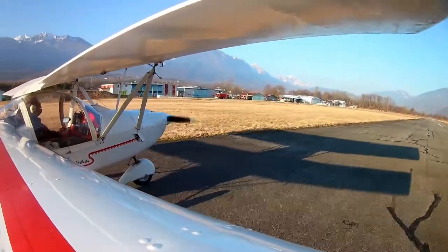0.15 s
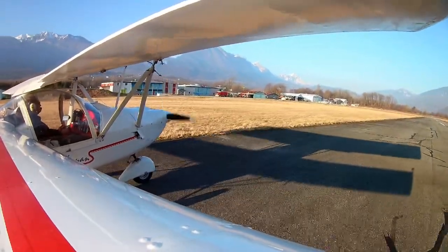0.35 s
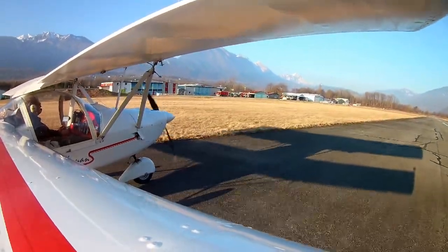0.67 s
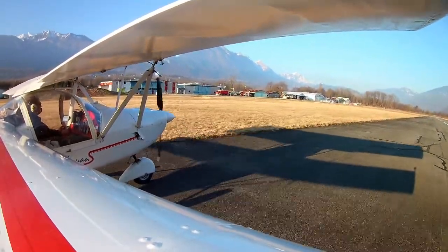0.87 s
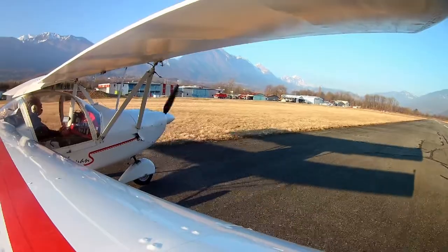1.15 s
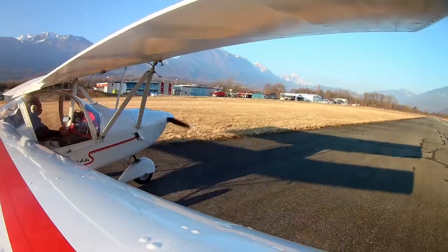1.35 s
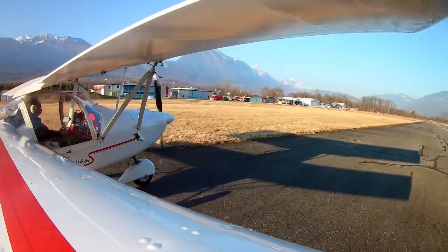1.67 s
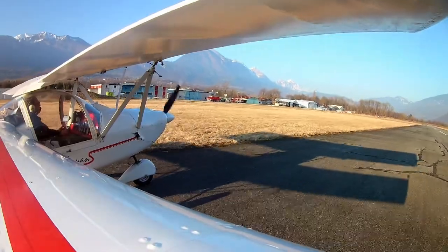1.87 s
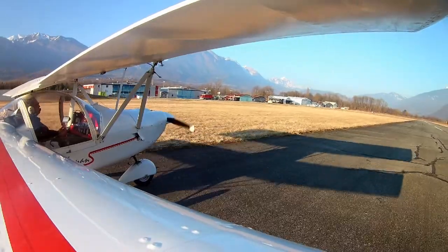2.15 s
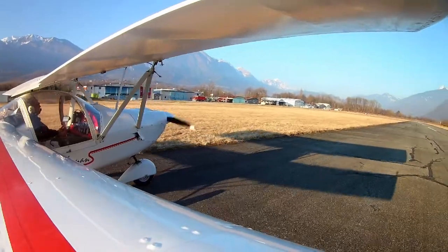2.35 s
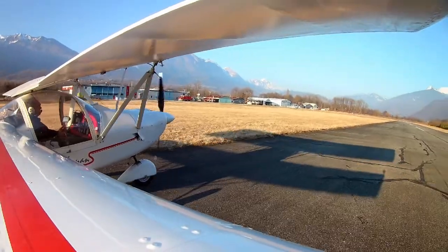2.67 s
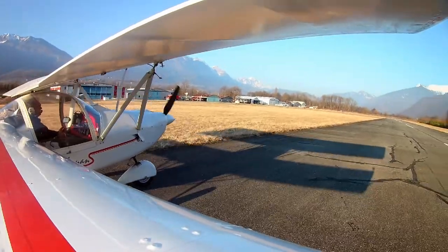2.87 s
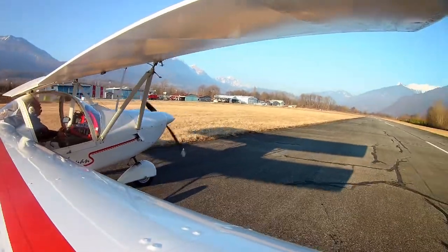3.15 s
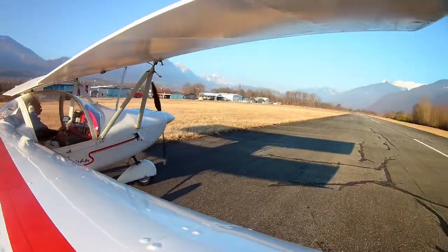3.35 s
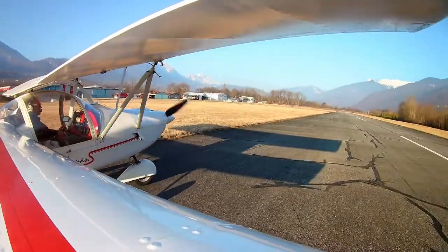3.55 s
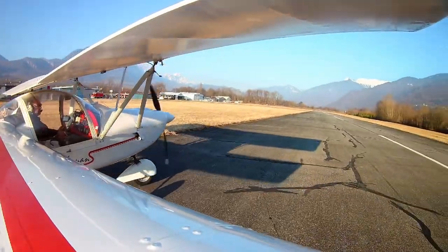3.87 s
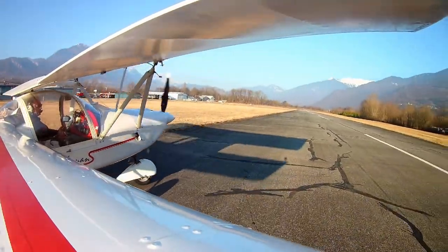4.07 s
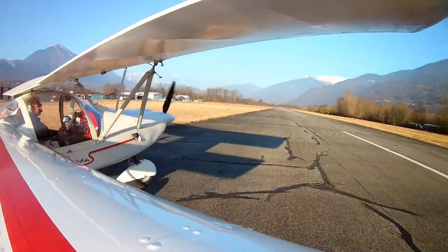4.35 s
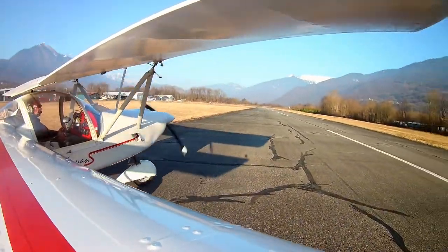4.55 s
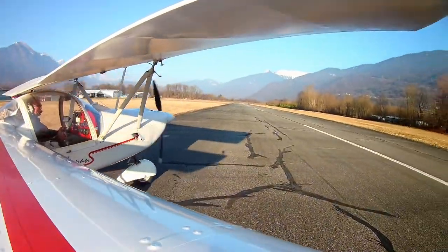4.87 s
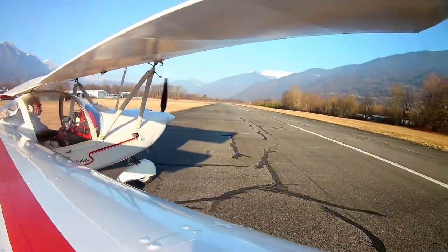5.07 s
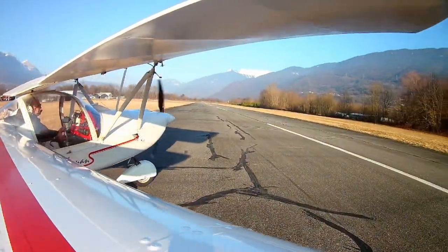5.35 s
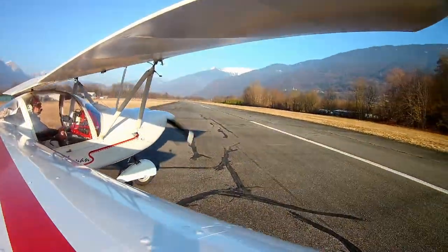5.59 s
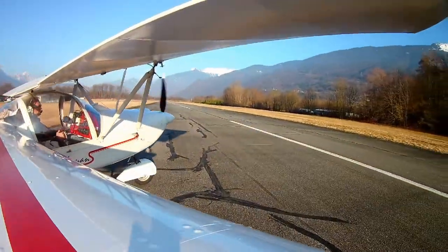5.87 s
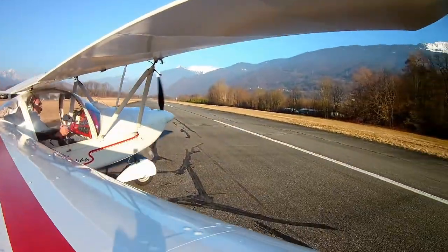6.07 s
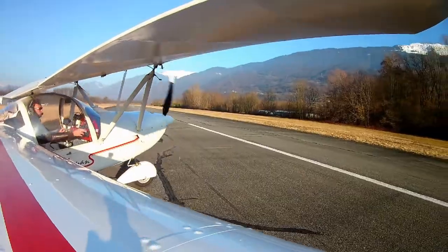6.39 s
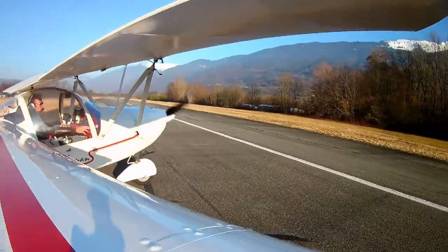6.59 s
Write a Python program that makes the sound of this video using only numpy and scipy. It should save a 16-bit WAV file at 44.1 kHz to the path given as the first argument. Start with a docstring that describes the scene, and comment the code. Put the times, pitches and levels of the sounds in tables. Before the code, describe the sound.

Low light-aircraft engine drone with rattling metal gears and tyre rumble; scattered air thumps hit the microphone, then rapid distorted propeller blasts take over.

```python
"""Light aircraft taxiing, heard at the wing

The engine drones (sine waves), puffs and ticks (pulsing noise), while its propeller gearbox clatters
(clicks and short bursts of noise, coloured like metal). Tyres rumble on asphalt (wavering noise).
Swirls of air shed by the blades thump the camera's microphone now and then (sudden swings of pressure).
Near the end, as the aircraft turns, every blade hits and overloads it. Gusts, swishes and whistles
are noise or tones that swell and fade."""
import sys
import numpy as np
from scipy import signal
from scipy.fft import rfft, irfft
from scipy.io import wavfile
from scipy.ndimage import uniform_filter1d

SR = 44100
rng = np.random.default_rng(int(sys.argv[2]) if len(sys.argv) > 2 else 0)


def put_to_file(sound):
    """Save the sound as 16-bit audio at rate SR, in the file named by the first command-line argument."""
    columns = np.atleast_2d(sound).T  # one column per channel
    safe = np.clip(columns, -1, 1)
    whole_steps = np.round(safe * 32767)
    wavfile.write(sys.argv[1], SR, whole_steps.astype(np.int16))


N = 296352
TIME = np.arange(N) / SR  # seconds

# Engine speed. Each row: time in seconds, shaft turns per second before a small wobble.
SHAFT_SPEED = [(0, 25.37), (1.2, 25.2), (1.7, 27.96), (2.4, 26.82), (3.45, 28.85), (3.8, 26.45),
               (4.7, 27.16), (5.1, 29.18), (5.55, 30.2), (5.8, 27.47), (6.72, 28.26)]
# Tones of the engine drone. Each row: multiple of the shaft speed, level in dB relative to each other.
DRONE_TONES = [(1, 5), (2, -10), (3, -3), (4, -4), (5, -0.5), (6, -5), (7, -3.5), (8, -14), (9, -18)]
# Exhaust loudness. Each row: time in seconds, relative level in dB.
EXHAUST_LEVEL = [(0.0, -47), (0.66, -43.5), (0.86, -44.5), (1.78, -48.5), (2.26, -42.5), (3.8, -44),
                 (4.15, -40.5), (5.24, -40.5), (5.55, -38.5), (6.01, -34.5), (6.4, -29), (6.6, -31.5)]
# Colour of the exhaust noise. Each row of this and every other colour: frequency in Hz, relative level in dB.
EXHAUST_COLOUR = [(150, -12), (400, -9), (620, -2), (800, 1), (950, 2), (1150, -5.5), (1450, 0),
                  (1900, -13), (2400, -16.5), (3200, -27), (7000, -67)]
# Loudness of the machinery hiss. Each row: time in seconds, relative level in dB.
MACHINERY_LEVEL = [(0.0, -48.5), (0.24, -59), (0.6, -43.5), (0.88, -54), (1.53, -58.5), (2.21, -48),
                   (3.74, -50), (5.11, -46), (5.43, -51), (6.72, -39)]
# Colour of the machinery hiss. Each row: frequency in Hz, relative level in dB.
HISS_COLOUR = [(1180, -48), (2000, -7.5), (2360, 7.5), (2780, -10.5), (3380, -3.5), (4230, 1), (4950, -5),
               (6160, -9), (7430, 1), (8010, -16), (8690, -7), (10500, 0.5), (12000, -29.5), (15600, -64),
               (22000, -120)]

# Loudness of the rolling tyres. Each row: time in seconds, relative level in dB.
ROLLING_LEVEL = [(0.0, -32.5), (0.19, -32), (0.43, -27.5), (1.01, -30.5), (1.17, -32.5), (1.93, -43),
                 (2.74, -38), (3.43, -40), (4.29, -40.5), (4.83, -46.5), (5.15, -38), (5.6, -43.5)]
# Colour of the tyre rumble. Each row: frequency in Hz, relative level in dB.
RUMBLE_COLOUR = [(20, -18), (45, 6), (90, 0.5), (150, -1), (230, 1.5), (330, -9.5), (500, -18.5),
                 (1000, -53), (3000, -58), (8000, -70)]

# Stray blade vortices. Each row: time in seconds, pressure strength (1 is full scale, before shaping),
# core length in ms, share of the opposite-spinning vortex ahead of it.
STRAY_VORTICES = [(.023, 0.45, 2.1, 0), (0.211, 0.85, 0.25, 0), (0.481, 0.44, 0.82, 0),
                  (0.535, 0.99, .2, .8), (.793, 1.17, 0.62, 0), (.883, 1.04, 0.23, .5),
                  (0.974, 1.14, 0.3, .8), (1.066, 1.14, .9, .3), (2.119, 1.2, 0.98, 0),
                  (2.155, 0.38, 2.3, 0), (2.582, 0.59, 0.55, 0), (2.630, .9, 0.29, 0),
                  (2.679, 0.93, 0.94, 0), (3.006, 1.08, 0.89, 0), (3.055, 0.94, 0.22, .3),
                  (3.100, 1.4, 0.48, 0), (4.026, 0.97, 0.27, 0), (4.072, 1.32, 0.36, .5),
                  (4.112, 1.9, 0.75, 0), (4.15, 1.14, 1.3, 0), (4.192, 1.05, 1.9, 0),
                  (4.285, 0.78, 0.96, 0), (4.362, 0.32, 2, 0), (4.452, 1.12, 1.33, 0),
                  (5.13, 0.31, 0.43, 0), (5.163, 0.36, 0.53, .3), (5.197, 0.27, .6, 1), (5.71, .35, 1.6, 0)]
THUMP_WIDTH_MS, COUNTER_LEAD_S = 11.4, 0.0187
# Colour of the small eddies around a vortex. Each row: frequency in Hz, relative level in dB.
EDDY_COLOUR = [(30, 9.5), (100, -12.5), (220, 7), (400, -9.5), (800, -12.5), (1500, -21), (3000, -26.5),
               (6000, -26.5), (12000, -41)]
# Colour of the large eddies between the blades. Each row: frequency in Hz, relative level in dB.
SLIPSTREAM_COLOUR = [(20, -27.5), (45, 3), (70, 5.5), (110, -1), (170, -15), (300, -38), (800, -66)]

# Lone hard slaps of the gearbox. Each row: time in seconds, relative strength in dB,
# typical wait in ms before the teeth swing back.
LONE_SLAPS = [(0.034, -11, 21), (.139, -12.5, 12), (.196, -22, 18.5), (.2277, -17.5, 12.5),
              (0.289, -15, 20), (.4305, -16, 13), (.4694, -14, 20), (.7067, -19, 6), (0.489, -12, 41),
              (1.2387, -23.5, 11.4), (1.284, -27.5, 17), (1.3785, -12.5, 22.6), (1.482, -16, 16.4),
              (1.529, -16, 10.4), (1.615, -14.5, 16.4), (1.7596, -18, 7.6), (1.948, -21, 10.2),
              (2.037, -12, 35.5), (2.2885, -16, 44), (2.5849, -11.5, 48), (2.7858, -13.5, 12),
              (2.802, -13.5, 7.4), (2.9072, -18.5, 7.2), (3.5123, -17, 12), (3.818, -14, 20),
              (3.937, -18, 7.8), (3.9954, -14, 18), (4.3208, -10.5, 38), (4.439, -12.5, 22),
              (5.569, -15, 16), (5.6563, -16.5, 13), (5.6934, -13, 10), (5.9974, -15, 6.6),
              (6.0882, -17, 5.2), (6.3425, -7.5, 21), (6.5176, -8.5, 20), (6.7017, -11.5, 18)]
# Bouts of gearbox rattle, mostly one slap a blade or a shaft turn. Each row: first and last slap in seconds,
# number of slaps, first and last relative strength in dB, typical wait in ms before the teeth swing back.
RATTLE_BOUTS = [(0.517, 0.664, 4, -15, -12.5, 13), (0.762, 1.134, 5, -11.5, -15, 24.7),
                (1.715, 1.849, 4, -18.5, -16, 16), (2.061, 2.192, 4, -17.5, -20.5, 26),
                (2.278, 2.611, 8, -18, -10.5, 15.9), (2.656, 2.846, 5, -21.5, -24, 10.3),
                (2.946, 3.129, 5, -12, -16, 15), (3.18, 3.787, 14, -21, -16.5, 14.8),
                (4.0125, 4.351, 9, -12, -22.5, 25.1), (4.423, 4.972, 16, -16, -16.5, 17),
                (5.007, 5.252, 8, -11, -12.5, 16.9), (5.285, 5.748, 13, -19, -19, 20.4),
                (5.792, 6.257, 11, -11.5, -13, 19.1), (6.2964, 6.693, 10, -11.5, -8, 20.5)]
SLAP_SCATTER_DB, SLAP_JITTER_S = 1.0, .0005  # typical change from slap to slap in a bout
SLAP_BRIGHT_DB = -26  # bright ring relative to the blow
BOUNCE_S, BOUNCE_DB = .008, -14.5  # the teeth bounce once on the same flank (before scatter)
BACK_DB, BACK_BRIGHT_DB = -5, -5.5  # then swing back on to the other flank, which rings brighter
TICKS_WITHIN_S, TICKS_DB = .036, -12.5  # loose fittings shaken by each slap
# Colour of the crack of a slap. Each row: frequency in Hz, relative level in dB.
CRACK_COLOUR = [(200, -16), (600, -9.5), (1100, -4.5), (2200, -11), (2900, -7), (3600, -2), (4200, 5),
                (5000, -0.5), (6100, 1), (7200, -6), (8500, -31), (12000, -32)]
# Colour of the bright metal ring. Each row: frequency in Hz, relative level in dB.
RING_COLOUR = [(4000, -10), (7500, -24), (9000, -7), (9600, -16), (10400, 2), (11500, -9.5), (13000, -13)]
# Colour of the gearbox casing. Each row: frequency in Hz, relative level in dB.
CASE_COLOUR = [(150, -19), (350, 5), (620, 8), (950, -5.5), (1500, -1), (2300, -1.5), (2900, -11),
               (4200, -3.5), (6200, -11.5), (8000, -9), (10500, -14), (13000, -59)]

# Soft gusts from the edge of the slipstream. Each row: loudest moment in seconds, level in dB,
# time in seconds to fall to about a third.
SOFT_GUSTS = [(0.3, -30, 0.03), (0.537, -11.5, 0.02), (2.33, -23, 0.022), (4.506, -28, 0.054),
              (5.133, -24.5, 0.092)]
# Colour of the gusts. Each row: frequency in Hz, relative level in dB.
GUST_COLOUR = [(20, -11), (55, 2.5), (110, -2.5), (200, -9), (400, -19.5), (800, -41), (2500, -61),
               (8000, -80)]
# Swishes of air past the wing. Each row: loudest moment in seconds, level in dB, centre in Hz,
# time in seconds to fall to about a third.
AIR_SWISHES = [(0.404, -29.5, 960, 0.01), (0.532, -30, 227, 0.024), (0.536, -25, 910, 0.021),
               (1.113, -31.5, 900, 0.023), (1.432, -40, 889, 0.015)]

# Steady propeller wash. Each row: time in seconds, blades per second, strength of the tip vortex and of the
# broad vortex (1 is full scale, before shaping), lag of the broad one in blade periods.
PROPELLER_WASH = [(5.765, 20.89, 0.83, -1.5, 0.77), (5.813, 21.35, 1.18, -0.76, 0.72),
                  (6.05, 21.79, 1.47, -1.52, 0.68), (6.2, 21.94, 1.6, -1.15, 0.6),
                  (6.33, 22.2, 1.52, -1.3, 0.4), (6.37, 22.47, 0.89, 1.4, 0.37),
                  (6.54, 22.61, 1.16, 0.87, .42), (6.58, 22.9, -0.96, 1, 0.433),
                  (6.72, 22.18, -0.56, 1.16, 0.46)]
# The two blades bite unequally. Each row: change of tip strength in dB, typical core length in ms,
# vortex width in ms, share of the partner vortex.
BLADE_BITES = [(-0.5, 0.43, 8, 0.36), (2, 0.44, 3.7, 0.61)]
# Edge whistles in the slipstream. Each row: loudest moment in seconds, basic pitch in Hz before it bends,
# peak level in dB.
EDGE_WHISTLES = [(6.5, 960, -19.5), (6.548, 1263, -22.5), (6.597, 1430, -21.5), (6.64, 1480, -20),
                 (6.687, 1430, -19)]
WHISTLE_FLUTTER = .04  # typical share by which the pitch flutters

TOP_HZ = 12200  # upper limit of the sound


def undb(db):
    """Turn decibels into a multiplier."""
    return 10 ** (np.asarray(db) / 20)


def unit(x):
    """Scale a signal to an rms level of 1."""
    return x / np.sqrt(np.mean(x ** 2))


def curves(table, at=TIME):
    """Join the rows of a table by straight lines in time; give back one curve per column."""
    s, *columns = np.transpose(table)
    return [np.interp(at, s, column) for column in columns]


def colour(x, points, size=4096):
    """Filter a signal to a drawn spectrum, with no sound ahead of its cause and unit filter energy."""
    hz, db = np.transpose(points)
    bins = np.maximum(np.fft.rfftfreq(size, 1 / SR), 1)
    level_db = np.interp(np.log(bins), np.log(hz), db)
    # folding the cepstrum packs the filter's energy at its start
    cepstrum = irfft(np.log(undb(level_db)))
    cepstrum[1:size // 2] *= 2
    cepstrum[size // 2 + 1:] = 0
    response = irfft(np.exp(rfft(cepstrum)))
    response = response / np.linalg.norm(response)
    return signal.fftconvolve(x, response)[:N]


def noise(points):
    """Make coloured noise of rms 1."""
    return unit(colour(rng.standard_normal(N), points))


def walk(rate):
    """Wander smoothly at random with spread 1, taking this many new values per second."""
    hold = int(SR / rate)
    steps = np.repeat(rng.standard_normal(N // hold + 1), hold)
    return unit(uniform_filter1d(steps, hold)[:N])


def engine(turns, exhaust_db, hiss_db):
    """Two firings a turn give a low drone and puffs of exhaust; the valve train ticks four times a turn."""
    drone = np.zeros(N)
    for multiple, db in DRONE_TONES:
        level = undb(db + 3.2 * walk(6.7))
        drone += level * np.sin(2 * np.pi * (multiple * turns + rng.random()))

    # each pulse jumps up, then dies away until the next
    firing = 0.12 + np.exp(-(2 * turns % 1) / 0.46)
    puff = unit(firing * undb(4.2 * walk(40)))
    exhaust = puff * noise(EXHAUST_COLOUR) * undb(exhaust_db - 2.5)

    valves = .5 + np.exp(-(4 * turns % 1) / .15)
    ticking = unit(valves * undb(4 * walk(300)))
    machinery = ticking * noise(HISS_COLOUR) * undb(hiss_db - 2)
    return undb(-35) * unit(drone) + exhaust + machinery


def tyres(rumble_db):
    """Rough asphalt shakes the wheels and airframe into an uneven rumble."""
    return noise(RUMBLE_COLOUR) * undb(rumble_db + 1.64 + 3.6 * walk(23))


def vortex(s, pressure, core_ms, width_ms, wake=0):
    """A passing swirl of air flips the pressure abruptly in its core and recoils gently further out."""
    near = slice(max(int((s - .1) * SR), 0), min(int((s + .1) * SR), N))
    ms = (TIME[near] - s) * 1000
    swing = ms / np.hypot(ms, core_ms)
    # a wake makes the trailing side stronger and longer than the leading side
    side = 1 + np.clip(wake, 0, .8) * swing
    reach = np.abs(ms) / (width_ms * side)
    recoil = (1 - reach ** 2) * np.exp(-reach ** 2 / 2 - reach)
    out = np.zeros(N)
    out[near] = pressure * side * swing * recoil
    return out


def thumps():
    """A stray tip vortex hits the microphone, at times led by another of opposite spin."""
    out = np.zeros(N)
    for s, pressure, core_ms, counter in STRAY_VORTICES:
        out += vortex(s, pressure, core_ms, THUMP_WIDTH_MS)
        out += vortex(s - COUNTER_LEAD_S, -counter * pressure, core_ms=1.2, width_ms=11.8)
    return out


def buffeting():
    """Vortices press on the microphone, each wrapped in small eddies that grow with its pressure."""
    single = thumps()
    steady = wash()
    stir = undb(-16.5) * np.abs(single) + undb(-15.0) * np.abs(steady)
    eddies = uniform_filter1d(stir, size=220) * noise(EDDY_COLOUR)
    # large slow eddies fill the slipstream between the blades
    fill = uniform_filter1d(np.abs(steady), size=4000)
    churn = undb(-11) * fill * noise(SLIPSTREAM_COLOUR)
    return single + steady + eddies + churn


def slaps():
    """Gear teeth slap in bouts or alone: columns of time in s, dB, swing back after ms."""
    rows = list(LONE_SLAPS)
    for first, last, count, first_db, last_db, back_ms in RATTLE_BOUTS:
        count = round(count)
        even = np.linspace((first, first_db), (last, last_db), count)
        scatter = rng.standard_normal((count, 2))
        for (s, db), (shift, hard) in zip(even, scatter):
            rows.append((s + SLAP_JITTER_S * shift, db + SLAP_SCATTER_DB * hard, back_ms))
    return np.transpose(rows)


def knocks():
    """Each slap bounces, swings back and shakes loose fittings: columns of time in s, dB, bright ring dB."""
    s, db, back_ms = slaps()
    bounce_gap, bounce_size, back_gap, back_size = rng.standard_normal((4, len(s)))
    dull = np.full(len(s), SLAP_BRIGHT_DB)
    bright = np.full(len(s), BACK_BRIGHT_DB)

    bounce_s = s + BOUNCE_S * undb(2.2 * bounce_gap)
    bounces = bounce_s, db + BOUNCE_DB + 3 * bounce_size, dull
    back_s = s + back_ms / 1000 + .0009 * back_gap
    backs = back_s, db + BACK_DB + 1.95 * back_size, bright
    tick_s = s + TICKS_WITHIN_S * rng.random(len(s))
    ticks = tick_s, db + TICKS_DB, bright
    return np.hstack([(s, db, dull), bounces, backs, ticks])


def strikes(times, sizes):
    """Place a single-sample click for each blow."""
    samples = np.clip(np.round(times * SR).astype(int), 0, N - 1)
    return np.bincount(samples, sizes, N)


def ring(blows, decay_s):
    """Many close metal tones sound like a burst of noise that dies away after each blow."""
    keep = np.exp(-2 / (decay_s * SR))
    power = signal.lfilter([1 - keep], [1, -keep], blows ** 2)
    return np.sqrt(power) * rng.standard_normal(N)


def clatter():
    """Gear teeth slap across their slack: a sharp crack, a bright ring, and the casing sounding on."""
    s, db, bright_db = knocks()
    early_s = s - .001 - 0.0035 * rng.random(len(s))  # a faint click just before each slap
    blows = strikes(early_s, undb(db - 14)) + strikes(s, undb(db))
    crack = colour(undb(4.5) * blows + undb(5.5) * ring(blows, decay_s=0.00061), CRACK_COLOUR)
    bright_blows = strikes(s, undb(db + bright_db))
    bright = colour(ring(bright_blows, decay_s=0.0005), RING_COLOUR)
    casing = colour(ring(blows, decay_s=0.0048), CASE_COLOUR)
    return crack + undb(7.5) * bright + undb(7.5) * casing


def gusts():
    """Broken-up air swells and fades on the microphone."""
    swell = np.zeros(N)
    for s, db, length in SOFT_GUSTS:
        swell += undb(db) * np.exp(-((TIME - s) / length) ** 2)
    return noise(GUST_COLOUR) * swell


def swishes():
    """Brief rushes of air around the wing: noise strongest near one frequency."""
    out = np.zeros(N)
    for s, db, hz, length in AIR_SWISHES:
        band = [(hz / 8, -35), (hz / 2, -6), (hz, 0), (hz * 1.25, -9), (hz * 4, -34), (hz * 8, -65)]
        out += noise(band) * undb(db) * np.exp(-((TIME - s) / length) ** 2)
    return out


def blade_times(blades):
    """Find the moments at which the blade count passes a whole number."""
    return np.interp(np.arange(0, blades[-1]), blades, TIME)


def wash():
    """Each blade throws a tight pair of tip vortices, and a broad one with a slower flip, at times the stronger."""
    blades = np.cumsum(curves(PROPELLER_WASH)[0]) / SR
    blades = blades - np.interp(PROPELLER_WASH[0][0], TIME, blades)  # count from the first row
    out = np.zeros(N)
    for k, s in enumerate(blade_times(blades)):
        hz, tip, _, lag = curves(PROPELLER_WASH, s)
        size, core, spacing, drift, breadth = rng.standard_normal(5)
        bite_db, core_ms, width_ms, partner = BLADE_BITES[k % 2]

        tip = tip * undb(bite_db + 0.56 * size)
        out += vortex(s, tip, core_ms * undb(1.5 * core), width_ms, wake=0.14)
        partner_s = s + 0.00385 * undb(1.7 * spacing)
        out += vortex(partner_s, partner * tip, core_ms=0.6, width_ms=6.2, wake=0.16)

        later = s + lag / hz + 0.00056 * drift - .001
        broad = curves(PROPELLER_WASH, later)[2]
        out += vortex(later, broad, core_ms=0.98, width_ms=9 * undb(1.0 * breadth), wake=0.16)
    return out


def whistles():
    """Gusts from the blades whistle briefly over an edge, rising and falling with the unsteady air speed."""
    out = np.zeros(N)
    flutter = 1 + WHISTLE_FLUTTER * walk(1100)
    for s, hz, db in EDGE_WHISTLES:
        gust = np.exp(-((TIME - s) / .005) ** 2)
        pitch = hz * flutter * (.8 + .23 * gust)
        out += undb(db) * gust * np.sin(2 * np.pi * np.cumsum(pitch) / SR)
    return out


def scene():
    """Add up engine, wheels and moving air at the wing."""
    speed = curves(SHAFT_SPEED)[0] * (1 + .012 * walk(10))
    turns = np.cumsum(speed) / SR
    motor = engine(turns, curves(EXHAUST_LEVEL)[0], curves(MACHINERY_LEVEL)[0]) + clatter()
    rolling = tyres(curves(ROLLING_LEVEL)[0])
    air = buffeting() + gusts() + swishes() + whistles()
    return (motor + rolling + air)[None]


def record(dry):
    """Bass overloads the microphone; the camera blocks steady pressure, dips in the treble and cuts the top."""
    sound = signal.sosfilt(signal.butter(1, 4, "high", fs=SR, output="sos"), dry)
    bass = signal.sosfiltfilt(signal.butter(2, 2200, fs=SR, output="sos"), sound)
    # the bass is flattened first, treble added back; then the loudest peaks of all are flattened
    clipped = np.clip(bass, -.88, .88) + sound - bass
    hollow = signal.lfilter(*signal.iirnotch(7950, 5, fs=SR), clipped)
    limited = np.clip(hollow, -.91, .91)
    return signal.sosfilt(signal.ellip(8, .2, 60, TOP_HZ, fs=SR, output="sos"), limited)


dry = scene()
out = record(dry)
put_to_file(out)
```